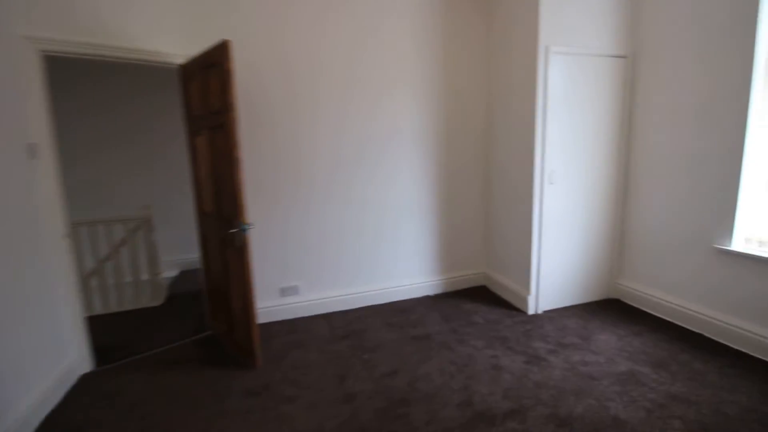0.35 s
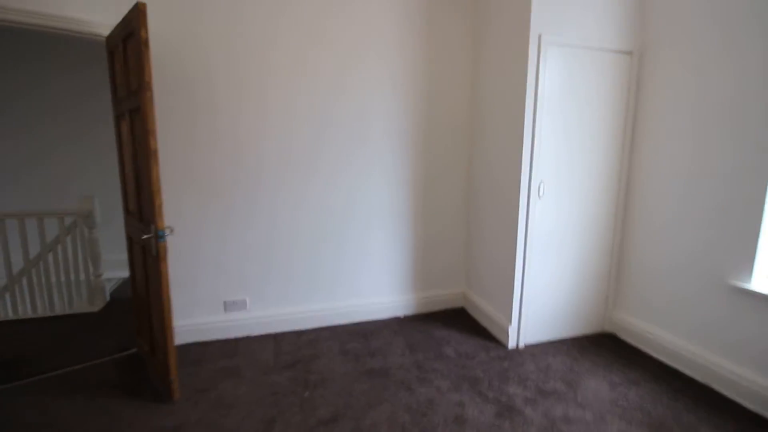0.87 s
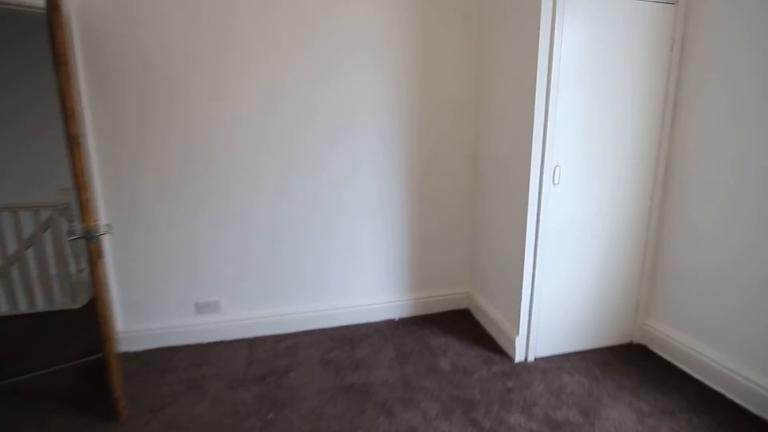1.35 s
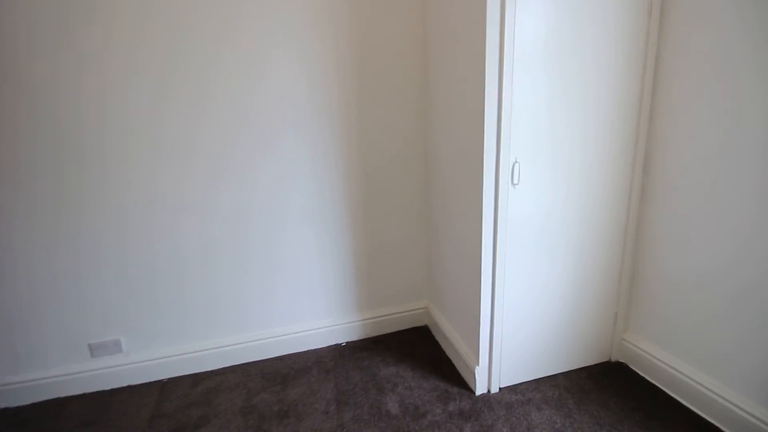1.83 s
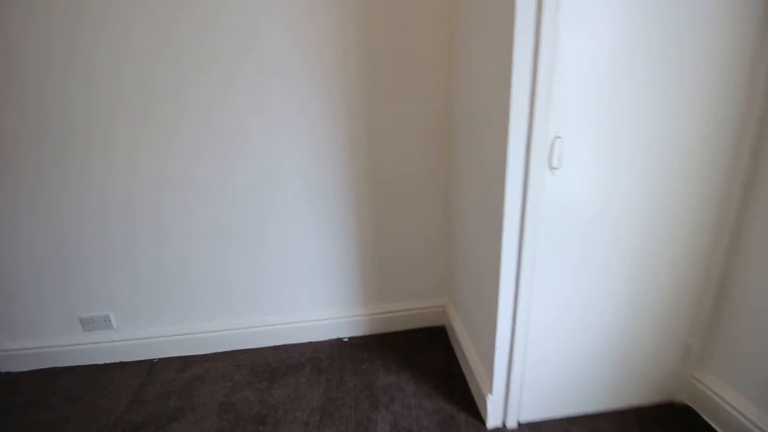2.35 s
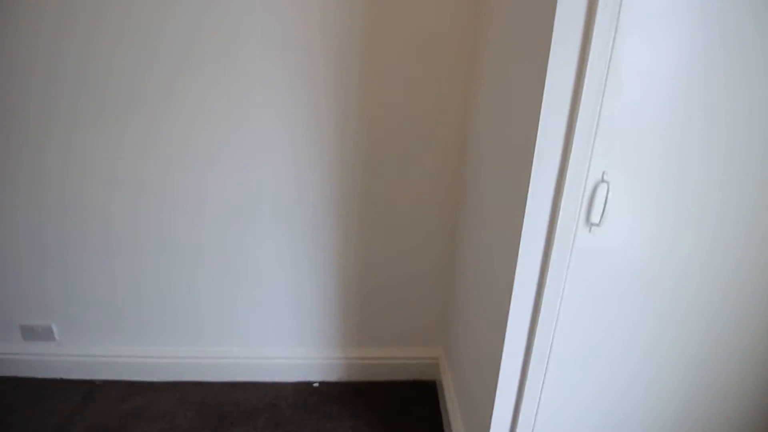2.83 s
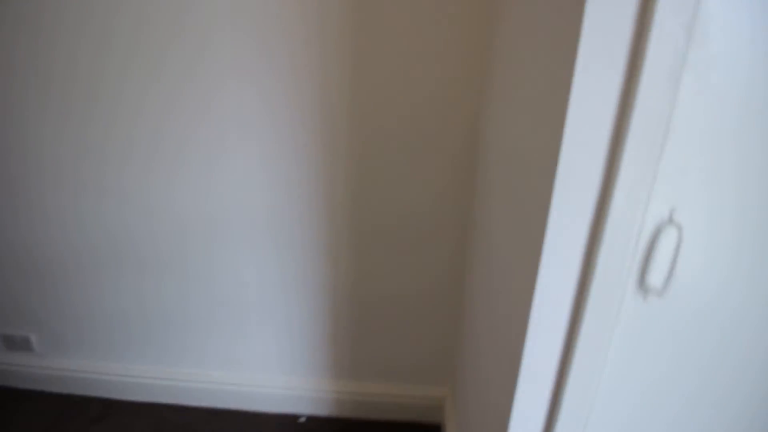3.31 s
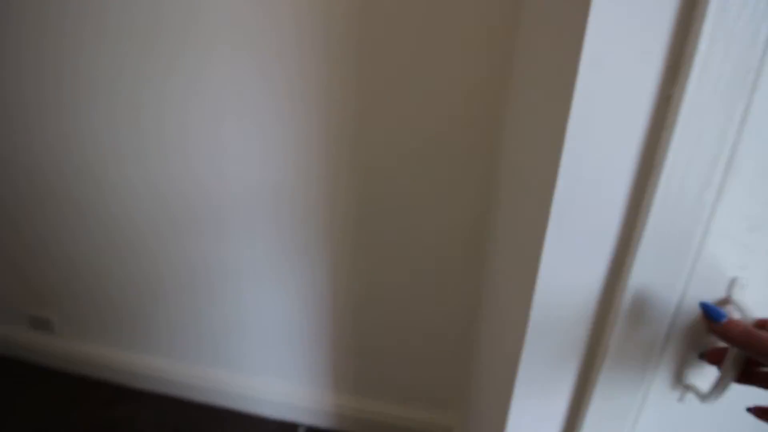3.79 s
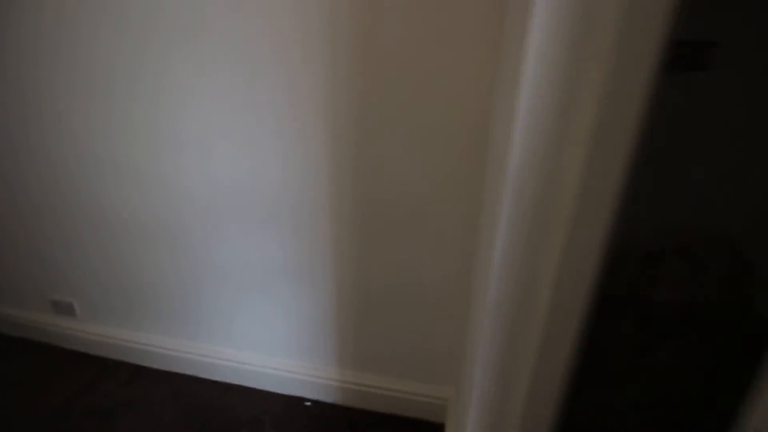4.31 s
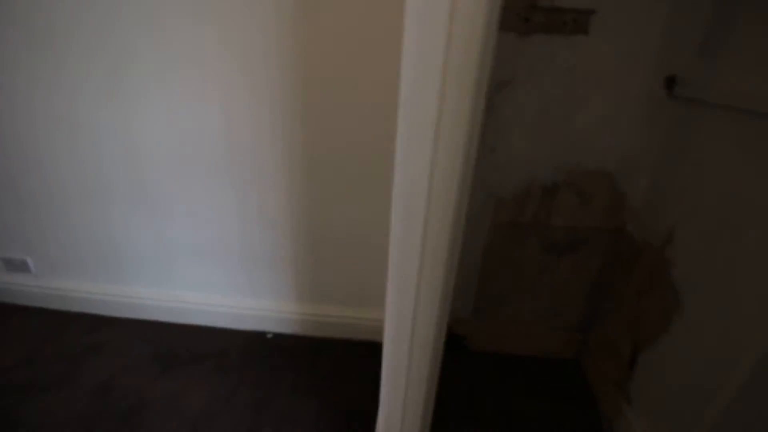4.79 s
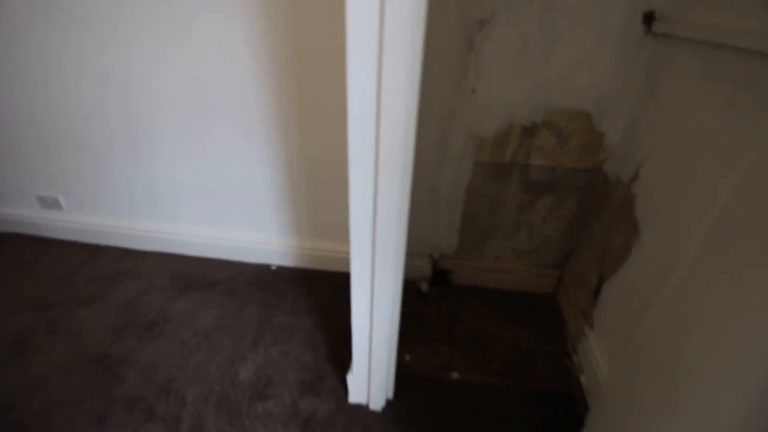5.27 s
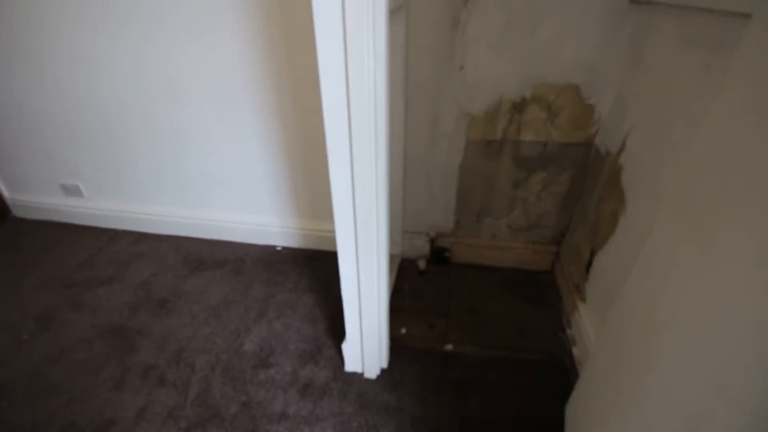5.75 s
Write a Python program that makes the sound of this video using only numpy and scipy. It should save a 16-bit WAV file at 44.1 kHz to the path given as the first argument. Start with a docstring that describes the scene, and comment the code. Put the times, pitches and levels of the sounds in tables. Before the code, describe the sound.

In a bare, echoing room, muffled steps and wooden knocks lead to a cupboard door pulled open with a metallic snap, then a low thump of air.

```python
"""Footsteps cross a carpeted wooden floor in an empty room, and a cupboard door is pulled open.
Soles brush the carpet as grainy noise, heels thud as swells of low noise, loose boards knock as struck modes.
The door judders (random slips through panel resonances), its catch snaps (crack and ringing steel),
and its draught buffets the microphone (low noise, opposed left and right).
Walls answer knocks, clicks and door with decaying noise; faint steady hiss lies under all."""
import sys
import numpy as np
from scipy import signal
from scipy.fft import rfft, irfft, next_fast_len
from scipy.io import wavfile
from scipy.ndimage import uniform_filter1d, map_coordinates

SR = 44100
rng = np.random.default_rng(int(sys.argv[2]) if len(sys.argv) > 2 else 0)


def boost_factor(decibels):
    """Convert a level in decibels to a linear amplitude factor."""
    exponent = np.asarray(decibels, float) / 20
    return 10 ** exponent


def master_out(mix):
    """Clip the mix to full scale and print it as 16-bit PCM to the path in sys.argv[1]."""
    frames = np.transpose(np.atleast_2d(mix))
    ceiling = np.clip(frames, -1, 1)
    pcm = np.round(ceiling * 32767).astype(np.int16)
    wavfile.write(sys.argv[1], SR, pcm)


N = 259749  # samples

# How alike left and right are in noise and room. Each row: frequency in Hz, likeness from 0 to 1.
STEREO_LIKENESS = [(60, 0.7), (180, 0.97), (550, 0.8), (1650, 0.26), (4970, 0.29), (15000, 0.0098)]


def unit(x):
    """Scaled to rms 1."""
    return x / np.sqrt(np.mean(x ** 2) + 1e-20)


def along(points, hz):
    """(Hz, value) points read on a log frequency axis."""
    f, v = np.transpose(points)
    return np.interp(np.log(hz + 1), np.log(f + 1), v)


def wobble(rate):
    """A smooth random curve, rate knots a second."""
    knots = rng.standard_normal(int(N * rate / SR) + 4)
    return map_coordinates(knots, [np.arange(N) * rate / SR])


def filtered(x, response):
    """x times a complex response of frequency."""
    m = next_fast_len(x.shape[-1] + 8192)
    spectrum = rfft(x, m) * response(np.fft.rfftfreq(m, 1 / SR))
    return irfft(spectrum, m)[..., :x.shape[-1]]


def swells(at, db, rise, fade, hold=0, rest_db=-120):
    """Gain per sample: swells climb and fade in dB per s, with a hold in s; their powers add."""
    late = np.arange(N)[:, None] / SR - at
    level_db = db + rise * np.minimum(late, 0) - fade * np.maximum(late - hold, 0)
    return np.sqrt(np.sum(boost_factor(2 * level_db), axis=1) + boost_factor(2 * rest_db))


def rush(spectrum, patchy_db, source=None):
    """Stereo noise of rms 1, its time-frequency patches at random gains, coloured and set in width."""
    noise = rng.standard_normal((2, N)) if source is None else source
    z = signal.stft(noise, nperseg=512)[2]
    field = uniform_filter1d(rng.standard_normal(z.shape[1:]), size=6, axis=0)
    field = uniform_filter1d(field, size=10, axis=1)
    pair = signal.istft(z * boost_factor(patchy_db * unit(field)), nperseg=512)[1][:, :N]

    def mid_side(hz):
        turn = np.arccos(np.clip(along(STEREO_LIKENESS, hz), 0, 1)) / 2
        return boost_factor(along(spectrum, hz)) * [np.cos(turn), np.sin(turn)]

    mid, side = filtered(pair, mid_side)
    return unit(np.array([mid + side, mid - side]))


def tail():
    """A fresh stereo room answer: noise dying at its own pace in each band, widest in the treble."""
    # Bare walls. Each row: frequency in Hz, 60 dB decay time in s.
    wall_decay = [(100, 0.77), (500, 0.4), (2000, 0.48), (5000, 0.54), (12000, 0.16)]
    hz, t, z = signal.stft(rng.standard_normal((2, SR * 3 // 4)), SR, nperseg=256)
    alike = np.clip(along(STEREO_LIKENESS, hz), 0, 1)[:, None]
    z[1] = alike * z[0] + np.sqrt(1 - alike ** 2) * z[1]
    decay = boost_factor(-60 * t / along(wall_decay, hz)[:, None])
    late = signal.istft(z * decay, SR, nperseg=256)[1]
    late *= 1 - np.exp(-np.arange(late.shape[1]) / SR / 0.0039)  # build-up, time constant in s
    return late / np.linalg.norm(late[0])


def add(out, s, blow, pan_db, room_db):
    """Places a blow with its own room answer; pan_db is left over right in the dry sound."""
    wet = boost_factor(room_db) * signal.fftconvolve(blow[None], tail(), axes=1)
    wet[:, :len(blow)] += blow * boost_factor([[pan_db / 2], [-pan_db / 2]])
    start = round(s * SR)
    out[:, start:start + wet.shape[1]] += wet


def ring(modes, seconds, attack, scatter_db):
    """Decaying sine modes struck at new strengths, peak 1; attack is a time constant in s."""
    t = np.arange(round(seconds * SR)) / SR
    hz, db, t60 = np.transpose(modes)[:, :, None]
    db = db + scatter_db * rng.standard_normal(db.shape)
    sign = (-1.) ** np.arange(len(hz))[:, None]  # neighbouring modes start in opposite directions
    x = np.sum(sign * boost_factor(db - 60 * t / t60) * np.sin(2 * np.pi * hz * t), axis=0)
    x *= 1 - np.exp(-t / attack)
    return x / np.abs(x).max()


def hiss():
    """Faint noise at a steady level."""
    # Colour of the hiss. Each row: frequency in Hz, relative density in dB per Hz.
    hiss_colour = [(18, -33.5), (30, -20.5), (203, -12), (258, 2.5), (382, -13), (483, -19.5), (716, -1.5),
                   (838, -11), (1890, -13), (8870, -22.5), (15800, -29.5)]
    return boost_factor(-54.5) * rush(hiss_colour, patchy_db=-0.3)


def brushing():
    """Fibres catch on soles and clothes as fine noise grains; the door's sweep shares their texture."""
    # Soles and clothes brushing. Each row: loudest moment in seconds, level in dB, rise in dB per s.
    strokes = [(.1, -53.5, 300), (.3, -45.5, 46.5), (.62, -50, 92), (.84, -47, 150), (1.08, -42, 41),
               (1.65, -41.5, 38), (2.04, -50, 102), (2.27, -41.5, 120), (2.72, -48, 198), (2.95, -40, 156),
               (3.272, -40.5, 150), (3.78, -47.5, 264), (3.95, -39, 62), (4.4, -48, 32), (4.64, -50, 38),
               (5.024, -44, 400), (5.69, -61, 103)]
    # Short flicks of cloth. Each row: time in seconds, level in dB.
    flicks = [(1.32, -42.5), (3.514, -43.5), (4.434, -57), (5.292, -49)]
    # The door sweeps out of its frame: time in seconds, level in dB, rise and fade in dB per s.
    sweep = (4, -30.5, 326, 80)
    # Colour of the swish. Each row: frequency in Hz, relative density in dB per Hz.
    swish_colour = [(350, -30), (600, -7), (878, -5.5), (1200, -4.5), (1900, -7), (2340, -6.5), (2900, -9),
                    (8750, -20.5), (12500, -35.5), (15500, -52)]
    stroke_gain = swells(*np.transpose(strokes), fade=37.6, hold=0.012, rest_db=-65)
    flick_gain = swells(*np.transpose(flicks), rise=1200, fade=100)
    gain = np.sqrt(stroke_gain ** 2 + flick_gain ** 2 + swells(*sweep) ** 2)
    grain_db = np.minimum(3 * rng.exponential(size=(2, N)), 15)
    grains = rng.standard_normal((2, N)) * boost_factor(grain_db)
    return gain * boost_factor(0.97 * wobble(30)) * rush(swish_colour, patchy_db=1.1, source=grains)


def footfalls():
    """The dull part of each step is a held swell of noise; joists thud in a lower band."""
    # Each row: time in seconds, level of the dull body in dB, level of the joist thud in dB.
    steps = [(.3, -45.5, -68), (.85, -51, -50), (1.32, -44, -55), (1.47, -54, -50), (1.6, -40, -51),
             (2.07, -65, -54), (2.13, -47, -51), (2.74, -45.5, -62), (3.0, -43, -61), (3.31, -44, -49.5),
             (3.62, -80, -67), (3.92, -47, -45), (4.3, -47, -51), (4.57, -44.5, -48), (5.19, -50.5, -66)]
    # Colours of body and thud. Each row: frequency in Hz, relative density in dB per Hz.
    body_colour = [(53, -47.5), (90, -12), (201, 0.5), (247, -12), (293, 3), (376, 1.5), (433, 0.5),
                   (1200, -18), (1560, -38), (2640, -120)]
    thud_colour = [(15, 0), (30, 0.5), (45, 0), (65, -15), (95, 6), (140, -39)]
    at, body_db, thud_db = np.transpose(steps)
    body_gain = swells(at, body_db, rise=39, fade=83, hold=0.074, rest_db=-57)
    body = body_gain * boost_factor(2.4 * wobble(25)) * rush(body_colour, patchy_db=2.15)
    thud_gain = swells(at, thud_db, rise=176, fade=81, rest_db=-65.5)
    return body + thud_gain * rush(thud_colour, patchy_db=0.9)


def knocks():
    """Blows ring the wood mostly near and below their brightest pitch, and crack as the joint slips."""
    # Boards and door. Each row: start in seconds, level in dB, brightest pitch in Hz,
    # fall above it in dB per octave, level of the crack against the body in dB.
    blows = [(.193, -34, 560, 8.5, -8.5), (0.297, -37.5, 483, 6, -6.5), (0.909, -34.5, 403, 25, -12),
             (1.249, -27, 432, 33, -17.5), (1.419, -33.5, 590, 17, -11), (1.564, -16.5, 565, 18, -16),
             (2.118, -31.5, 310, 12, -16), (2.7448, -13, 650, 14.5, -13), (2.798, -24.5, 700, 18, -17),
             (3.248, -34.5, 410, 9, -8), (3.734, -43.5, 413, 8, -15), (4.169, -34.5, 170, 41, -30),
             (4.342, -28.5, 780, 23, -14.5), (4.43, -36, 490, 23, -28), (4.533, -22.5, 810, 25, -21.5),
             (4.831, -38.5, 404, 32, -34), (5.113, -13.5, 280, 20.5, -37)]
    # Modes of the wood. Each row: frequency in Hz, relative level in dB, 60 dB decay time in s.
    wood = [(130, -11, 0.16), (172, -3, 0.18), (210.9, 0, 0.17), (256.6, 3, 0.12), (280, -1.5, 0.15),
            (311.3, -1, 0.18), (378, 3, 0.087), (458, 0.5, 0.059), (488.4, -1, 0.097), (542.7, 1, 0.085),
            (632.5, 1.5, 0.036), (725, 2, 0.044), (792, -4, 0.08), (868, -6.5, 0.041), (978, -3.5, 0.068),
            (1082, -0.5, 0.026), (1460, -3.5, 0.048), (1550, -4, .035), (1790, 8, 0.03)]
    # Colour of the crack. Each row: frequency in Hz, relative density in dB per Hz.
    crack_colour = [(200, -39), (600, 7.5), (1000, 10), (1300, 3.5), (1750, 2.5), (2400, -8), (3400, -7),
                    (4200, -24), (5200, -12), (7000, -23), (12000, -65)]
    out = np.zeros((2, N + 2 * SR))
    hz, level, t60 = np.transpose(wood)
    t = np.arange(SR // 2) / SR
    for s, db, bright_hz, fall_db, crack_db in blows:
        octaves = np.log2(hz / bright_hz)
        weight_db = np.where(octaves > 0, -fall_db * octaves, 5 * octaves)
        modes = np.transpose([hz, level + weight_db, t60])
        body = ring(modes, .5, attack=0.00027, scatter_db=1.5)
        crack = unit(filtered(rng.standard_normal(len(t)), lambda f: boost_factor(along(crack_colour, f))))
        crack *= boost_factor(crack_db - 60 * t / 0.16)
        crack *= 1 - np.exp(-t / 0.00075)
        contact = 0.63 * boost_factor(-60 * t / 0.0096) * np.sin(2 * np.pi * bright_hz * t)
        add(out, s, boost_factor(db) * (body - contact + crack), pan_db=.4, room_db=-0.27)
    return out[:, :N]


def clicks():
    """Small short clicks answered by the room, each a few damped cycles of three modes."""
    # Each row: start in seconds, level in dB, pitch in Hz, left over right in dB.
    ticks = [(2.7565, -24.5, 3780, -12), (3.902, -28, 4640, -15), (3.929, -37, 4500, -1.5),
             (4.4268, -32.5, 6600, -6)]
    out = np.zeros((2, N + 2 * SR))
    for s, db, pitch_hz, pan_db in ticks:
        modes = [(pitch_hz, 0, .003), (1.4 * pitch_hz, -3, .002), (.7 * pitch_hz, -4, .003)]
        tick = ring(modes, 1 / 50, attack=.0001, scatter_db=1.5)
        add(out, s, boost_factor(db) * tick, pan_db, room_db=-1.5)
    return out[:, :N]


def door():
    """Uneven soft slips against the frame shake the panel and scrape; the whole leaf flaps near 66 Hz."""
    # The door drags out of its frame. Each: time in seconds, level in dB, rise and fade in dB per s,
    # hold in s (if negative, the fade starts before that time and lowers the peak).
    judder = (3.965, -29, 240, 95, 0.0857)
    scrape = (3.963, -29, 600, 138, -0.0849)
    flap = (3.955, -33, 300, 110, .09)
    # Resonances of the door panel. Each row: frequency in Hz, width in Hz, relative level in dB.
    panel_modes = [(170, 123, -4.5), (219, 30, 0), (254, 47, -5), (384, 44, 1), (560, 200, -12)]
    slips = (rng.random(N) < 900 / SR) * rng.standard_normal(N)  # about 900 slips a second
    slips = slips + .03 * rng.standard_normal(N)

    def panel_response(f):
        total = 0
        for k, (centre, width, db) in enumerate(panel_modes):
            band = 1j * f * width / (centre * centre - f * f + 1j * f * width)
            total = total + (-1) ** k * boost_factor(db) * band
        return total / (1 + 1j * f / 700) ** 2  # softened above 700 Hz

    def grit_response(f):
        return (1j * f * 1100 / (1250 ** 2 - f * f + 1j * f * 1100)) ** 3

    panel = unit(filtered(slips, panel_response))
    grit = unit(filtered(slips + 0.1 * rng.standard_normal(N), grit_response))
    rattle = swells(*judder) * panel + swells(*scrape) * grit
    swing = np.sin(2 * np.pi * 66 * np.arange(N) / SR + 1.6 * wobble(22))
    leaf = swells(*flap) * boost_factor(1.8 * wobble(40)) * unit(swing)
    room = boost_factor(-8) * signal.fftconvolve(rattle[None], tail(), axes=1)[:, :N]
    return (leaf + rattle) * boost_factor([[-.6], [.6]]) + room


def catch():
    """The catch lets go and rebounds: a sharp crack and a short steel ring, stronger on the right."""
    # Each row: start in seconds, level in dB, brightness in dB per octave, left over right in dB.
    snaps = [(4.011, -14.5, -7, -19), (4.0151, -15, -11, -3)]
    # Modes of the spring steel. Each row: frequency in Hz, relative level in dB, 60 dB decay time in s.
    spring_steel = [(1150, -25, 0.0054), (1790, -28, .006), (2370, -15, 0.0073), (2900, -10, 0.017),
                    (3240, -5, 0.01), (3900, -1.5, 0.0064), (4300, -6, 0.003), (4820, -0.5, 0.0039),
                    (5440, -7, 0.0046), (6900, -14, 0.0029), (9000, -16, .003)]
    out = np.zeros((2, N + 2 * SR))
    t = np.arange(SR // 50) / SR
    hz, level, t60 = np.transpose(spring_steel)

    def grit_band(f):
        return 1j * f * 4000 / (4500 ** 2 - f * f + 1j * f * 4000)

    def soft_top(f):
        return 1 / (1 + 1j * f / 11000 - (f / 9500) ** 2) ** 3

    for s, db, tilt_db, pan_db in snaps:
        modes = np.transpose([hz, level + tilt_db * np.log2(hz / 4000), t60])
        steel = ring(modes, 1 / 50, attack=.00005, scatter_db=1.5)
        contact = 2.1 * boost_factor(-60 * t / 0.0017) * np.sin(2 * np.pi * 4100 * t)
        grit = unit(filtered(rng.standard_normal(len(t)), grit_band))
        crack = 0.21 * boost_factor(-60 * t / 0.0092) * grit
        snap = filtered(steel + contact + crack, soft_top)
        add(out, s, boost_factor(db) * snap, pan_db, room_db=-3.5)
    return out[:, :N]


def draught():
    """Air pushed past the microphone by the swinging door presses one port and pulls the other."""
    # Puffs of air. Each row: time in seconds, level in dB, fade in dB per s.
    air_puffs = [(5.057, -18, 420), (5.118, -28.5, 300), (5.25, -31, 98), (5.358, -26.5, 132),
                 (5.536, -37.5, 297), (5.7, -46, 53), (5.88, -41, 298)]
    # Colour of the puffs. Each row: frequency in Hz, relative density in dB per Hz.
    puff_colour = [(15, 2.5), (40, -10), (70, -5), (130, -6), (250, -16), (500, -63)]
    at, db, fade = np.transpose(air_puffs)
    gain = swells(at, db, rise=420, fade=fade) * boost_factor(2.9 * wobble(26))
    pressure = rush(puff_colour, patchy_db=1.0)[0] * gain
    return pressure * boost_factor([[-8], [0]]) * [[-1], [1]]  # left is inverted and 8 dB weaker


def scene():
    """All sources over the steady hiss."""
    walk = brushing() + footfalls()
    cupboard = door() + catch() + draught()
    return hiss() + walk + knocks() + clicks() + cupboard


def band_limit(x):
    """A steep low-pass at the top of the band."""
    return signal.sosfilt(signal.butter(12, 15950, fs=SR, output="sos"), x)


def record(dry):
    """The recorder clips at full scale."""
    mix = np.clip(dry, -1, 1)
    return band_limit(mix)


dry = scene()
out = record(dry)
master_out(out)
```